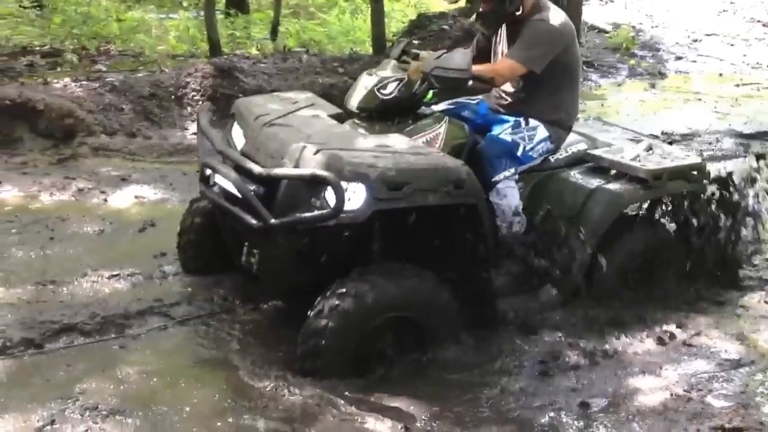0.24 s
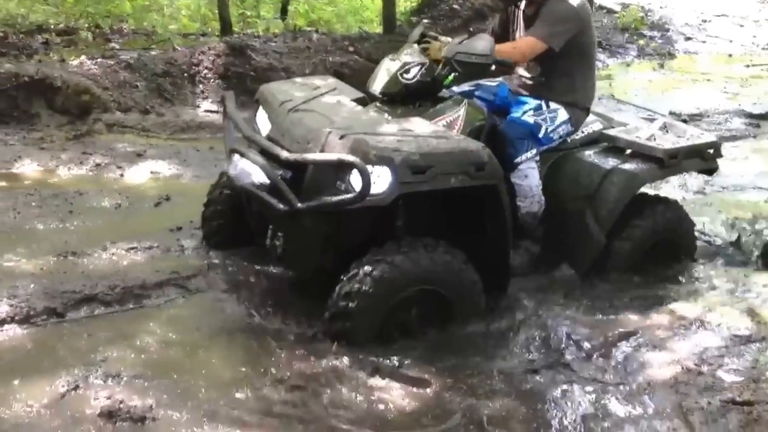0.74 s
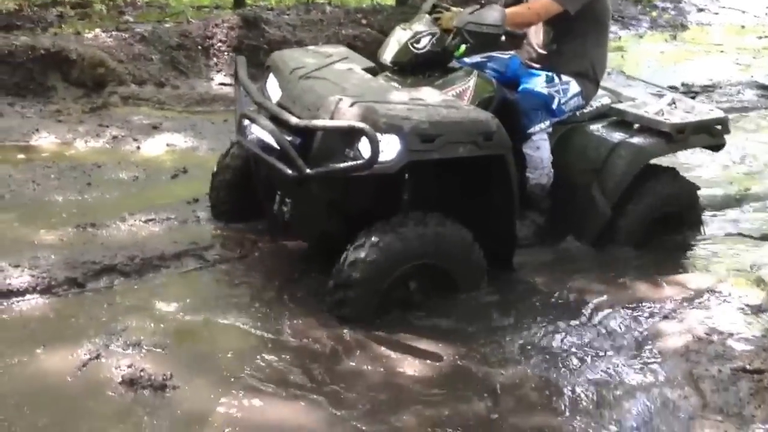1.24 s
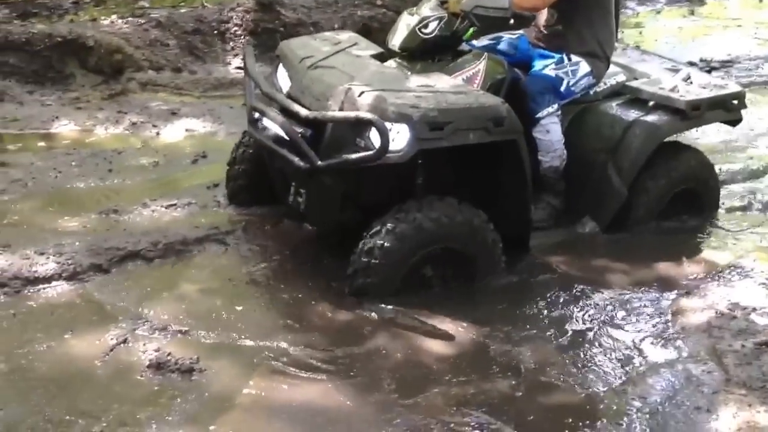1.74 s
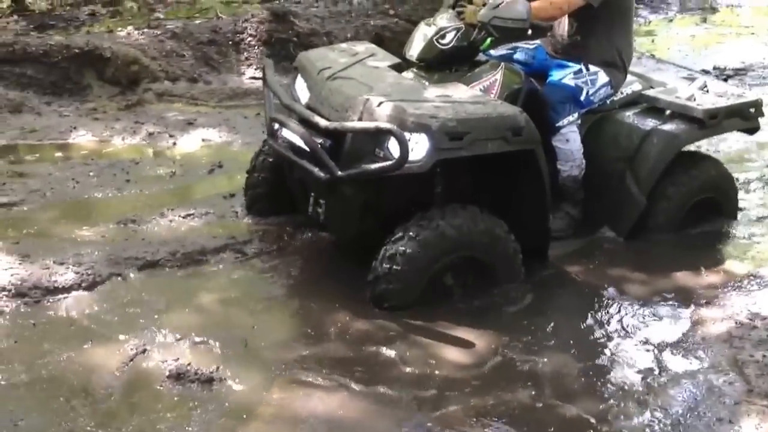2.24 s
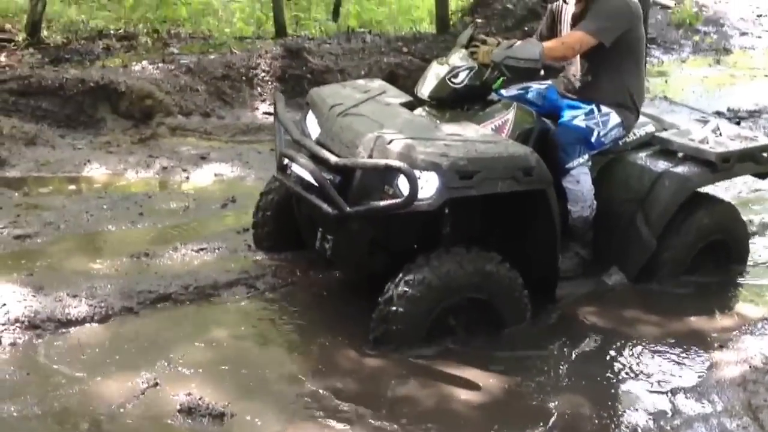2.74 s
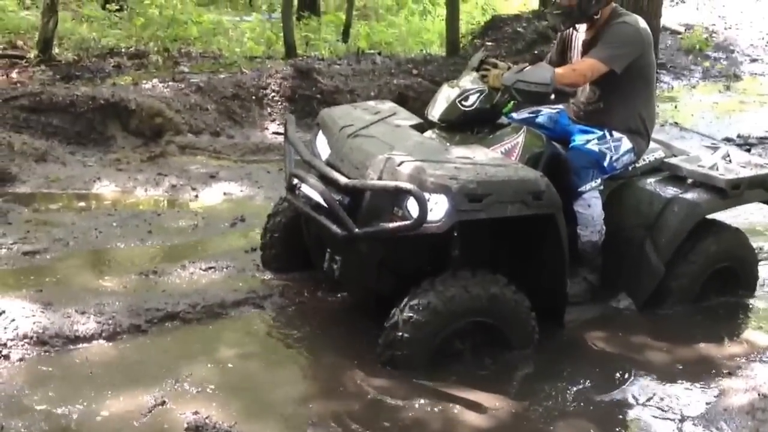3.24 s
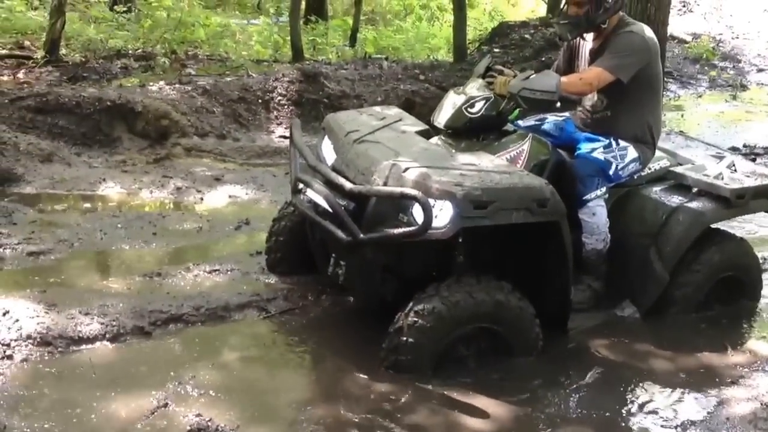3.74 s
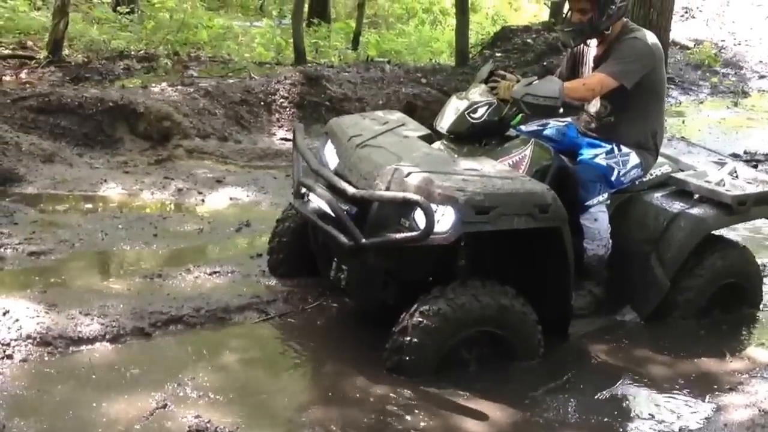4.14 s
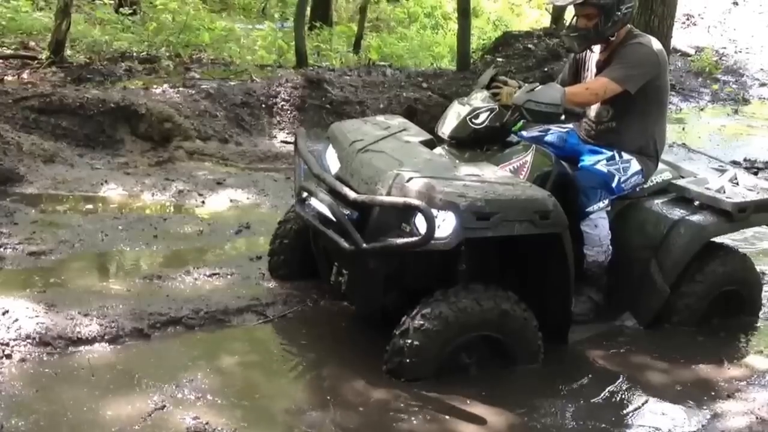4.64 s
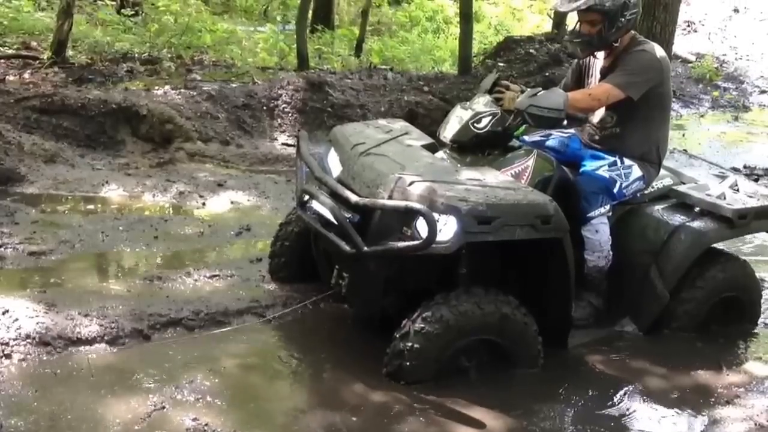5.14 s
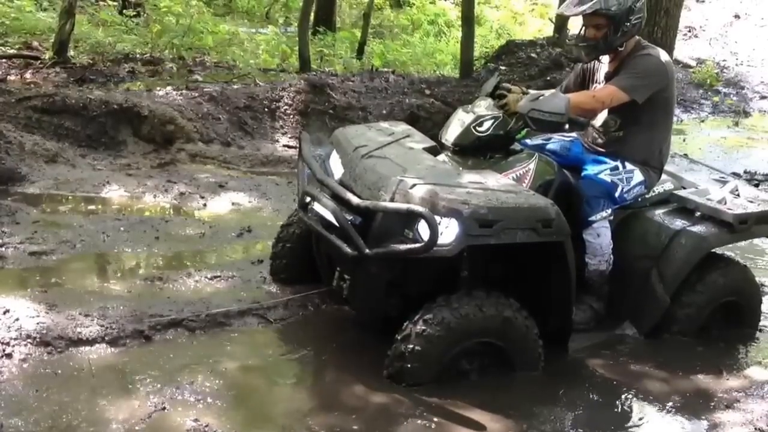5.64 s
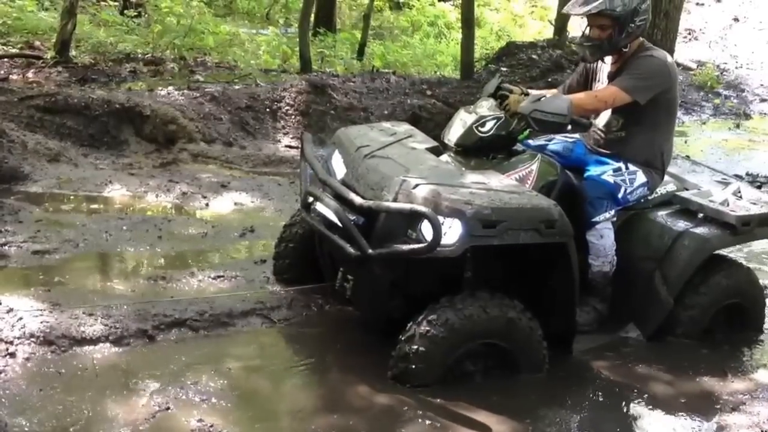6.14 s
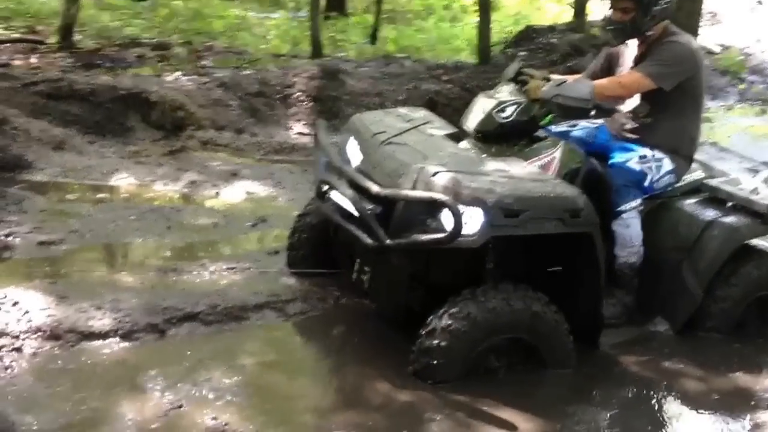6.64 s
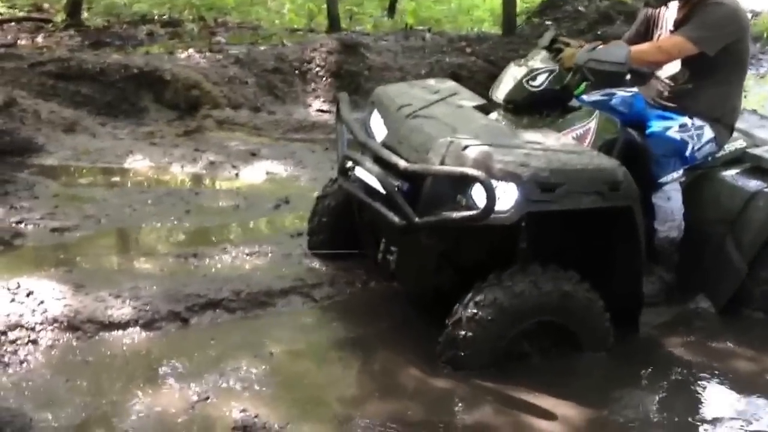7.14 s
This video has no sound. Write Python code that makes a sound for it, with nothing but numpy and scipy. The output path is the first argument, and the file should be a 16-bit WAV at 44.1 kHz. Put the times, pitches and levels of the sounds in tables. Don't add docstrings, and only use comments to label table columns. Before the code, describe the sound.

Close outdoors on wet ground, a single-cylinder quad bike drops from a high rev with belt squeals and flying mud. Two throaty blips and quick jabs follow, with rattling metal and wet slaps. The engine briefly holds, then sinks to slow, separate idle thumps over a steady fan rush and faint winch whine. At the end it revs hard again. A small microphone slightly rounds the loud peaks.

```python
import sys
import numpy as np
from scipy import signal
from scipy.fft import rfft, irfft, next_fast_len
from scipy.io import wavfile

SR = 44100
rng = np.random.default_rng(int(sys.argv[2]) if len(sys.argv) > 2 else 0)


def generate_wav(signal):
    frames = np.transpose(np.atleast_2d(signal))
    scaled = np.clip(frames, -1, 1) * 32767
    pcm = np.round(scaled).astype(np.int16)
    wavfile.write(sys.argv[1], SR, pcm)


def undo_db(level):
    steps = np.asarray(level, float) / 20
    return 10 ** steps


N = 325899


def rms_one(x):
    return x / np.sqrt(np.mean(x ** 2) + 1e-20)


def in_time(rows):
    s, *columns = np.transpose(rows)
    return [np.interp(np.arange(N) / SR, s, c) for c in columns]


def spell(s, length):
    return np.exp(-(2 * (np.arange(N) / SR - s) / length) ** 2)


def swells(rows):
    return sum(height * spell(s, length) for s, length, height in rows)


def drift(rate):
    knots = rng.standard_normal(int(N / SR * 200) + 2)
    return rms_one(np.interp(np.arange(N) / SR * rate, np.arange(len(knots)), knots))


def resonate(x, hz, width):
    r = np.exp(-np.pi * width / SR)
    poles = [1, -2 * r * np.cos(2 * np.pi * hz / SR), r * r]
    return signal.lfilter([(1 - r * r) / 2, 0, (r * r - 1) / 2], poles, x + 1e-18)


def peak(hz, centre, width):
    return 1 / (1 + (2 * (hz - centre) / width) ** 2)


def cut(x, hz, kind):
    return signal.sosfilt(signal.butter(4, hz, kind, fs=SR, output="sos"), x)


def colour(x, spectrum, modes, panels_db=2.5):
    size = next_fast_len(N)
    hz = np.maximum(np.arange(size // 2 + 1) * SR / size, 1)
    f, level_db = np.transpose(spectrum)
    db = np.interp(np.log(hz), np.log(f), level_db)
    db += sum(lift_db * peak(hz, mode_hz, width) for mode_hz, width, lift_db in modes)
    db += panels_db * np.interp(hz / 45, np.arange(600), rng.standard_normal(600))
    return irfft(rfft(x, size) * undo_db(db), size)[:N]


def cycle(turn, share, times=1):
    return np.cos(2 * np.pi * times * (turn - share))


def plinks(rows, width):
    out, age = np.zeros(N), np.arange(900) / SR
    for s, hz, peak_db in rows:
        start = int(s * SR)
        ring = np.exp(-np.pi * width * age) * np.sin(2 * np.pi * hz * age)
        out[start:start + len(age)] += undo_db(peak_db) * ring
    return out


def whine(rows, wobble_hz, flutter_db):
    hz, level_db = in_time(rows)
    first, last = rows[0][0], rows[-1][0]
    on = np.interp(np.arange(N) / SR, [first - .05, first, last, last + .05], [0, 1, 1, 0])
    phase = 2 * np.pi * np.cumsum(hz + wobble_hz * drift(40)) / SR
    return np.sqrt(2) * on * undo_db(level_db + flutter_db * drift(40)) * np.sin(phase)


def answer(law, rate, opened):
    return law[0] + law[1] * 20 * np.log10(rate / 25) + law[2] * opened


# opens [t/s], shuts [t/s], depth [0-1]
THROTTLE = [
    (-.2, 0.036, 0.24),
    (0.896, 1.277, 0.69),
    (2.093, 2.497, 0.73),
    (2.808, 2.95, 0.46),
    (3.096, 3.189, 1.02),
    (6.688, 7.5, 0.72),
]


def throttle():
    t, open_s, shut_s = np.arange(N) / SR, 0.051, 0.071
    return sum(depth * np.interp(t, [on, on + open_s, off, off + shut_s], [0, 1, 1, 0])
               for on, off, depth in THROTTLE)


# t/s, firings [per s]
CRANK = [(0.0, 47.56), (0.819, 11.42), (1.083, 29.12), (1.325, 38.53), (2.112, 11.9), (2.372, 28.88),
         (2.531, 35.24), (2.753, 25.34), (2.969, 28.52), (3.118, 25.06), (3.265, 30.9), (3.838, 23.86),
         (4.222, 14.47), (4.867, 8.07), (6.759, 7.95), (6.88, 15.76), (7.061, 25.67), (7.39, 37.99)]
# t/s, lead [cycles]
AHEAD = [
    (0, 0),
    (3.15, 0),
    (3.28, .36),
    (3.75, .36),
    (3.86, 0),
    (7.39, 0),
]
# middle [t/s], length [s], early by [cycles]
SURGES = [(0.834, 0.089, 0.11), (0.967, 0.074, 0.14), (1.992, .1, 0.059), (2.133, 0.078, .1),
          (2.274, 0.09, -.05), (3.847, 0.24, 0.077), (6.70, 0.072, 0.09), (7.056, 0.045, -0.11)]


def crank():
    rate = np.exp(in_time([(s, np.log(speed)) for s, speed in CRANK])[0])
    turn = -.012 + np.cumsum(rate) / SR + rate * .008
    turn = turn + in_time(AHEAD)[0] + swells(SURGES)
    return rate, np.maximum.accumulate(turn)


def strokes(turn, size, scatter_db):
    clicks = np.diff(np.floor(turn), prepend=np.floor(turn[0]))
    strength = undo_db(scatter_db * rng.standard_normal(400))
    return clicks * size * strength[np.floor(turn + 2).astype(int)]


# middle [t/s], length [s], f/Hz, level/dB against the exhaust
PIPE_SONGS = [(0.356, 0.11, 240, -10), (.49, .18, 247, -12), (1.036, 0.063, 252, -0.5),
              (1.598, 0.14, 241, 2), (2.795, 0.058, 235, -4), (3.08, 0.075, 248, 0),
              (3.87, 0.072, 180, -10), (4.256, 0.13, 254, -9), (7.353, 0.18, 219, 1.5)]


def pipe_song(fired, level_db):
    song, width_hz = 0, 59
    for s, length, hz, db in PIPE_SONGS:
        ring = resonate(resonate(fired / undo_db(level_db), hz, width_hz), hz, width_hz)
        song = song + undo_db(db) * spell(s, length) * rms_one(ring)
    return -undo_db(level_db) * song


# t/s, level/dB
EXHAUST = [(0, -14.5), (.3, -19.5), (.86, -33.5), (.95, -21), (1.29, -16), (1.5, -23), (2.15, -30.5),
           (2.24, -20.5), (2.5, -14.5), (2.9, -24.5), (3.9, -24.5), (4.44, -30.5), (4.72, -45.5),
           (4.87, -38.5), (6.76, -37), (6.812, -20), (6.98, -23), (7.39, -19)]
# f/Hz, width [Hz], level/dB
SILENCER = [(107.4, 33.4, 2), (194, 44.6, 6), (270.6, 28.2, 7), (346, 43, -10.5)]
# delay [s], level/dB
PIPE_ECHOES = [(.0120, -8), (.0172, -5), (.0290, -12), (.0520, -17)]
# middle [t/s], length [s], lift
# [dB]
CRISP = [(0.097, 0.24, -14), (.95, 0.22, 3), (2.247, 0.12, 1), (2.62, 0.23, -6.5), (3.8, .25, -1),
         (4.2, 0.54, -2.5), (6.86, 0.16, -7), (7.37, .1, -4)]


def exhaust(turn, rate, opened):
    level_db, = in_time(EXHAUST)
    crisp_db = swells(CRISP)
    loaded = opened * np.clip((rate - 20) / 9.5, 0, 1)
    closing_db = answer((-4, .1, -12), rate, opened) + 15.5 * loaded + crisp_db
    pipe_db = answer((-8, -.8, -10), rate, opened) + 16 * loaded
    gulp_db = np.minimum(answer((-12, -0.023, 0.12), rate, opened), -3) + crisp_db
    closing = 0.2413 + 0.038 * opened
    size = undo_db(level_db + 57.5) / np.sqrt(rate)

    fired = strokes(turn, size, scatter_db=1.2)
    gas = fired + undo_db(closing_db) * strokes(turn - closing, size, scatter_db=1.5)
    gas += undo_db(gulp_db - 3) * strokes(turn - .62, size, scatter_db=1.5)
    for delay, echo_db in PIPE_ECHOES:
        lag = int(delay * SR)
        bounce_db = echo_db + np.minimum(pipe_db, 0) + crisp_db + 1.5 * drift(15)
        gas[lag:] += undo_db(bounce_db)[lag:] * fired[:-lag]
    puff = (np.exp(-(turn % 1) / rate / 0.073) + 0.22) * rng.standard_normal(N)
    gas += undo_db(level_db + crisp_db + 10) * rms_one(puff)

    boom = 0
    chamber_laws = [(-1.9, -0.28, -1), (0.2, 0.014, 2.9), (-0.12, 0.25, -0.14), (4.7, 1, 7.7)]
    for k, ((hz, width, db), law) in enumerate(zip(SILENCER, chamber_laws)):
        boom = boom + undo_db(db + answer(law, rate, opened)) * (-1) ** k * resonate(gas, hz, width)
    singing = sum(spell(s, length) for s, length, _, _ in PIPE_SONGS)
    boom = boom * undo_db(-9 * evenness() + 1 * singing)
    boom = cut(cut(cut(-boom, 81.4, "high"), 70.0, "high"), 497, "low")
    return pipe_song(np.roll(fired, int(.002 * SR)), level_db) + boom


# from [t/s], to [t/s], trim [dB], growth [dB], favoured order, its lift [dB]
HARD_PULLS = [
    (1.082, 1.287, 3.3, 7, 7, 0.5),
    (2.363, 2.512, -5, 7, 6, 8),
    (7.194, 7.287, 3, 3, 7, -5.5),
]
CRUISES = [
    (3.265, 3.753, -1.5, -3, 4, 2.5),
]
# order, level/dB rms against the exhaust
HARD_ORDERS = [(4, -17), (5, -9.5), (6, -8), (7, -5.5), (8, -14), (9, -18), (10, -12), (11, -12.5)]
CRUISE_ORDERS = [(4, -7), (5, -8), (7, -14), (8, -10), (9, -7.5), (10, -8), (11, -8), (12, -16), (13, -11)]


def steady(spells, order=0):
    share, edge_s = 0, .05
    for a, b, db, grow_db, best, lift_db in spells:
        shape = np.interp(np.arange(N) / SR, [a - edge_s, a, b, b + edge_s], [0, undo_db(-grow_db), 1, 0])
        share = share + undo_db(db + lift_db * (round(best) == order)) * shape
    return share


def evenness():
    return steady([(a, b, 0, 0, 0, 0) for a, b, *_ in HARD_PULLS + CRUISES])


def orders_in_step(late, spells, orders, twin):
    tones = 0
    for order, db in orders:
        level = steady(spells, order) * undo_db(db + 1.8 * drift(12))
        pairing = np.sign(np.cos(np.pi * order * twin))
        slip = .07 * drift(12 / 2)
        phase = 2 * np.pi * (order * (late - twin / 2) + .9 + slip)
        tones = tones + pairing * level * np.cos(phase)
    return np.sqrt(2) * tones


def even_beat(turn, rate):
    late = turn - rate * .0072
    hard = orders_in_step(late, HARD_PULLS, HARD_ORDERS, twin=0)
    cruise = orders_in_step(late, CRUISES, CRUISE_ORDERS, twin=.38)
    band = signal.butter(2, [99, 336], "band", fs=SR, output="sos")
    return undo_db(in_time(EXHAUST)[0]) * (hard + signal.sosfiltfilt(band, cruise))


# level/dB, lead [cycles], lift in the steady pull [dB]
ORDER_TRIMS = [(-2.5, 0.23, -6), (-1, -0.32, 6.5)]
# middle [t/s], length [s], lift [dB]
LUGS = [
    (4.0, 0.32, 6),
    (1.78, 0.28, 9),
]


def drone(turn, rate, opened):
    tones, pull = 0, spell(3.76, 0.62)
    for order, (trim_db, lead, pull_db) in zip(range(4, 6), ORDER_TRIMS):
        db = trim_db + pull_db * pull + answer((-41.5, 2.05, 4.2), rate, opened)
        db = db + 7 * peak(order * rate, 120, 53) + 0.82 * drift(27.0)
        tones = tones + np.sqrt(2) * undo_db(db) * np.cos(2 * np.pi * (order * turn + lead))
    tones = tones * undo_db(-3.5 * evenness() + swells(LUGS))
    return cut(cut(tones, 92, "high"), 92, "high")


# middle [t/s], length [s], level/dB
RUSHES = [
    (1.13, 0.37, -35.5),
    (2.45, .2, -33),
    (6.72, 0.28, -50.5),
    (7.27, .2, -31),
]


def intake():
    t = np.arange(N) / SR
    air = rms_one(cut(cut(rng.standard_normal(N), 330, "high"), 620, "low"))
    thump = undo_db(-5.5) * np.exp(-t / 0.0056) * np.cos(2 * np.pi * 203 * (t - .001))
    return thump + air * sum(undo_db(db) * spell(s, length) for s, length, db in RUSHES)


# f/Hz, level/dB per Hz
CLATTER = [(240, -19.5), (400, -3), (480, -3), (650, 2), (965, 3), (1120, -3), (1540, -4.5), (1940, -0.5),
           (2590, -2.5), (3900, -16), (6060, -15), (10500, -38.5), (12200, -33.5), (15100, -34)]
# f/Hz, width [Hz], lift [dB]
CASING_MODES = [(639.5, 17, 1.5), (833, 94, 3), (1280, 86, 6), (1510, 58, 10.5), (2193, 52, 3.5),
                (2110, 370, -7), (2670, 150, 3), (3370, 720, 9.5)]


def clatter(turn, rate, opened):
    lag = np.exp(-1 / (0.022 * SR))
    shaken = signal.lfilter([1 - lag], [1, -lag], opened, zi=[lag * opened[0]])[0]
    casing_db = answer((-36, 2.05, 9.7), rate, shaken)
    valve_db = answer((-32, 1.6, 6.75), rate, shaken)
    hiss_db = answer((-37, 0.9, 8.86), rate, shaken)
    hiss_db = hiss_db - 0.19 * np.clip(10 - rate, 0, 1)

    bunch_db = 0.97 * cycle(turn, .15) + 1.0 * cycle(turn, .3, 2) + 0.42 * drift(25)
    bunch_db = bunch_db + opened * (drift(70) + cycle(turn, .25))
    ticks = rng.standard_normal(N) * undo_db(1.3 * np.minimum(rng.exponential(1, N), 5))
    body = colour(ticks * undo_db(bunch_db), CLATTER, CASING_MODES)
    low = cut(body, 1800, "low")
    middle = cut(cut(body, 1800, "high"), 4000, "low")
    high = rms_one(cut(body, 4000, "high"))
    high = cut(high, 8420, "low") + undo_db(0.17 * (hiss_db + 22.0)) * cut(high, 9750, "high")
    return undo_db(casing_db) * rms_one(low) + undo_db(valve_db) * rms_one(middle) + undo_db(hiss_db) * high


# f/Hz, width [Hz]
SHIELD_MODES = [(2120, 49), (2480, 130), (2570, 70), (5600, 2400)]
# level/dB at 25 firings per s, slope [dB per dB], open throttle [dB]
SHIELD_LAWS = [(-45, 1.7, 0.6), (-48.5, 0.98, 2.8), (-54, 0.9, 5.9), (-59.5, 3.9, 3.9)]
# swing over a cycle [dB], top [share of the cycle]
SHIELD_KICKS = [(7, 0.35), (0, 0.42), (1, 0.14), (1, 0.31)]
# shield [index], middle [t/s], length [s], lift [dB]
BUZZES = [(0, 1.48, 0.74, 7.5), (0, 2.6, 0.25, 6), (0, 7.23, 0.52, 10), (1, 1.14, 0.44, 14),
          (2, 1.2, .3, 14), (2, 2.2, 0.19, 16), (2, 2.9, 0.25, 9), (2, 7.2, .3, 12), (1, 2.64, 0.22, 16.5),
          (1, 1.536, 0.18, 16), (1, 2.98, 0.29, 13.5), (1, 3.32, 0.45, 19), (2, 3.6, 0.23, 17.5),
          (1, 7.3, .3, 11), (3, 7.3, 0.56, 15), (3, 4, 0.1, 18)]


def shields(turn, rate, opened):
    shake = rng.standard_normal(N)
    levels_db = [answer(law, rate, opened) for law in SHIELD_LAWS]
    for shield, s, length, lift_db in BUZZES:
        levels_db[int(round(shield))] += lift_db * spell(s, length)
    buzz = 0
    for (hz, width), db, (swing_db, share) in zip(SHIELD_MODES, levels_db, SHIELD_KICKS):
        kick = undo_db(swing_db * cycle(turn, share)) * shake
        buzz = buzz + undo_db(db) * rms_one(resonate(resonate(kick, hz, width), hz, width))
    return buzz


# t/s, f/Hz, peak level/dB
KNOCKS = [(7.062, 650, -24), (7.09, 620, -17), (7.092, 830, -19), (7.124, 600, -22), (7.13, 870, -23),
          (6.90, 750, -34)]


def driveline():
    return plinks(KNOCKS, width=61)


# start [t/s], level/dB
BELT = [
    (0.001, -16),
    (0.203, -24.5),
]


def belt():
    from_hz, to_hz, glide_s, hold_s, fade_s = 880, 758, 0.0447, 0.073, 0.029
    rows = []
    for s, db in BELT:
        rows += [(s + .002, from_hz, db - 10.0),
                 (s + 0.0195, from_hz - 45, db),
                 (s + glide_s, to_hz + 30, db - 13.0),
                 (s + hold_s, to_hz, db),
                 (s + hold_s + fade_s, to_hz - 60, db - 21),
                 (s + .125, to_hz - 110, db - 30)]
    return whine(rows, wobble_hz=5.3, flutter_db=1.5)


# t/s, peak level/dB, t60 [s], fizz [dB]
SLAPS = [(0.571, -2.5, 0.098, -3), (.59, -13, 0.34, -8), (0.673, -9.5, 0.38, -15), (0.8839, -7, 0.23, -18),
         (1.005, -28, .15, -6), (2.0644, -8, 0.072, -3), (2.1894, -21, 0.11, -6), (2.25, -13, 0.079, -3),
         (2.293, -14, 0.12, -6), (2.49, -5.5, 0.33, 3), (3.19, -26, 0.17, -3), (3.8296, -17, 0.14, 1),
         (5.54, -22, .3, -1), (6.78, -17, .2, -3), (7.105, -23, 0.16, 3)]


def slap(age, peak_db, t60):
    return undo_db(peak_db - 60 * age / max(t60, .02)) * (1 - np.exp(-age / .005))


def mud():
    t, burst, fizz = np.arange(N) / SR, 0, 0
    for s, peak_db, t60, fizz_db in SLAPS:
        age = np.maximum(t - s, 0)
        burst = burst + slap(age, peak_db - 14.0, t60)
        fizz = fizz + slap(age, peak_db + fizz_db - 27, t60 * 2.8)
    spray = rms_one(colour(rng.standard_normal(N), CLATTER, [], panels_db=1.0))
    raining = undo_db(-37.5 - 24 * t)
    lingering = undo_db(-53 + 1.7 * drift(12))
    mist = (raining + lingering + undo_db(-27 + 8) * fizz) * rms_one(cut(spray, 7400, "high"))
    return mist + burst * (undo_db(-5.5) * spray + cut(spray, 2090, "high"))


# t/s, f/Hz, peak level/dB
DROPS = [(.599, 7300, -20.5), (.623, 5000, -26), (.6938, 6550, -25), (.7592, 5460, -27), (.8854, 6240, -24),
         (2.0931, 5410, -24), (2.3416, 5550, -31), (3.8467, 5100, -18.5), (3.8651, 5630, -21),
         (7.0838, 5640, -21)]


def drops(rate):
    dripping = 1.4 * rate / 8
    flung = 230 * np.exp(-np.arange(N) / SR / 0.13)
    strength = undo_db(4.0 * np.minimum(rng.exponential(1, N), 3))
    born = (rng.random(N) < (dripping + flung) / SR) * strength
    dealt = rng.integers(0, 14, N)
    pitches_hz = np.geomspace(900, 8000, 14)
    small = sum(resonate(born * (dealt == k), hz, hz / 12) for k, hz in enumerate(pitches_hz))
    return undo_db(-14) * small + plinks(DROPS, width=190)


# f/Hz, level/dB per Hz
FAN = [(180, -21), (300, 1), (482, -21), (945, 4), (1650, -5), (2070, 0.5), (2700, -4), (3340, -1),
       (3930, -6), (6120, -5), (8210, -11.5), (10700, -31.5), (12200, -58), (15100, -54)]
# f/Hz, width [Hz], lift [dB]
FAN_MODES = [(547, 170, 6), (718, 165, 6), (882, 18, 6.5), (1004, 68, 4), (1230, 58, 10.5), (2100, 58, 1.5),
             (2420, 50, 9), (2933, 75, 8), (3087, 120, 3.5), (3373, 170, 7.5), (5070, 1200, 5),
             (5950, 340, 4)]


def fan(turn):
    beat = np.cos(2 * np.pi * np.cumsum(52.65 + 0.72 * drift(2.99)) / SR)
    sway_db = 2.0 * beat + 0.37 * cycle(turn, .1) + 0.29 * cycle(turn, .1, 2) + .9 * drift(15)
    sway_db = sway_db + 2 * spell(6.79, 0.74)
    rush = rng.standard_normal(N) * undo_db(sway_db)
    return undo_db(-34) * rms_one(colour(rush, FAN, FAN_MODES, panels_db=3.0))


# t/s, f/Hz, level/dB
WINCH = [(.9, 1458, -65), (1.6, 1457, -46), (3.2, 1505, -47.5), (3.8, 1478, -45), (4.7, 1448, -46),
         (6.3, 1440, -50), (6.9, 1434, -59)]


def winch():
    return whine(WINCH, wobble_hz=1.5, flutter_db=1.2)


def rumble():
    level_db = -66 + 0.93 * in_time(EXHAUST)[0] - 2 + 3.6 * drift(4.6)
    return undo_db(level_db) * rms_one(cut(cut(rng.standard_normal(N), 100, "low"), 34, "high"))


def scene():
    opened = throttle()
    rate, turn = crank()
    quad = exhaust(turn, rate, opened) + even_beat(turn, rate) + drone(turn, rate, opened) + intake()
    quad += clatter(turn, rate, opened) + shields(turn, rate, opened) + driveline() + belt()
    quad += mud() + drops(rate) + fan(turn) + winch() + rumble()
    return (quad - 0.31 * resonate(quad, 452, 79))[None]


def band_limit(x):
    return signal.sosfilt(signal.butter(12, 15400, fs=SR, output="sos"), x)


def record(dry):
    top_cut = signal.ellip(12, .5, 55, 15200, fs=SR, output="sos")
    mix = signal.sosfilt(top_cut, 1.37 * np.tanh(dry / 1.26))
    return band_limit(mix)


dry = scene()
out = record(dry)
generate_wav(out)
```